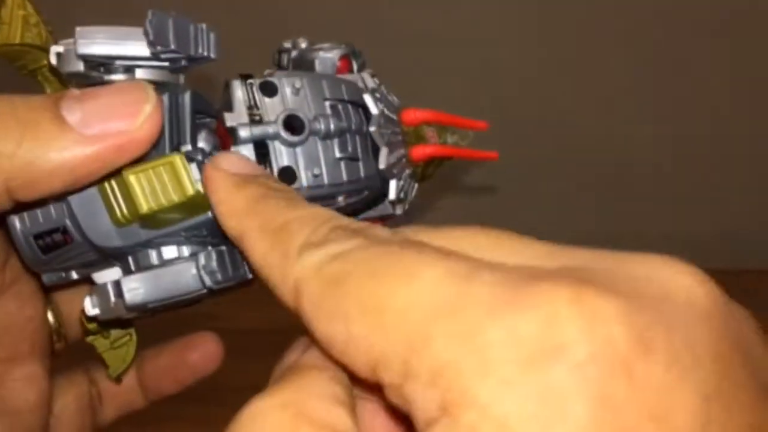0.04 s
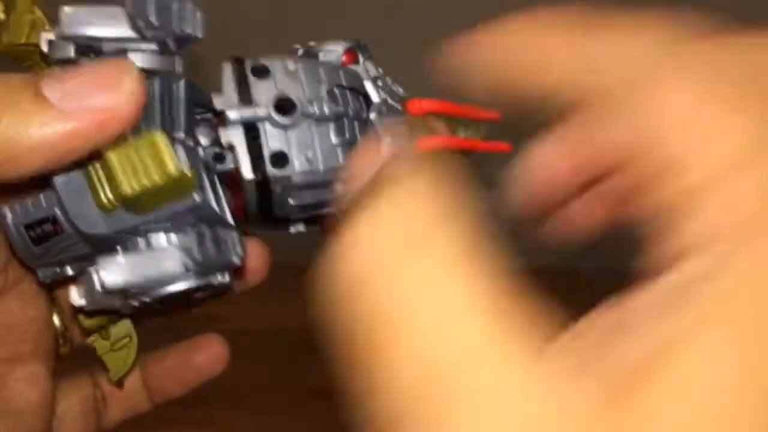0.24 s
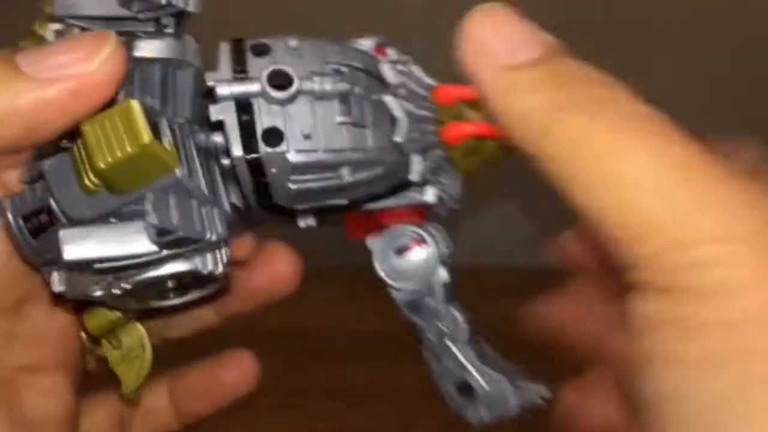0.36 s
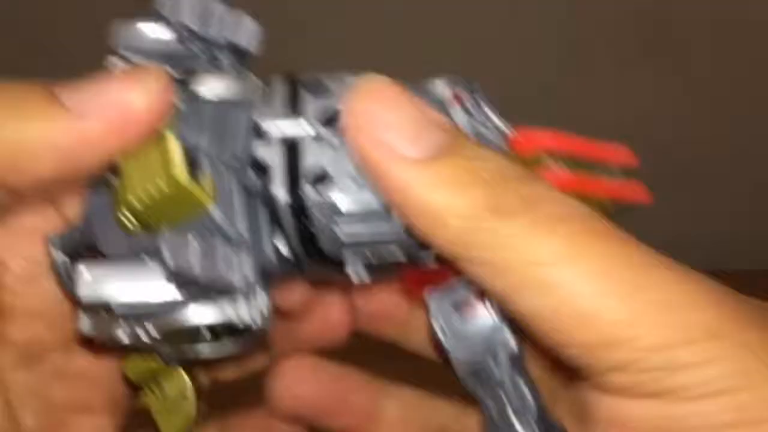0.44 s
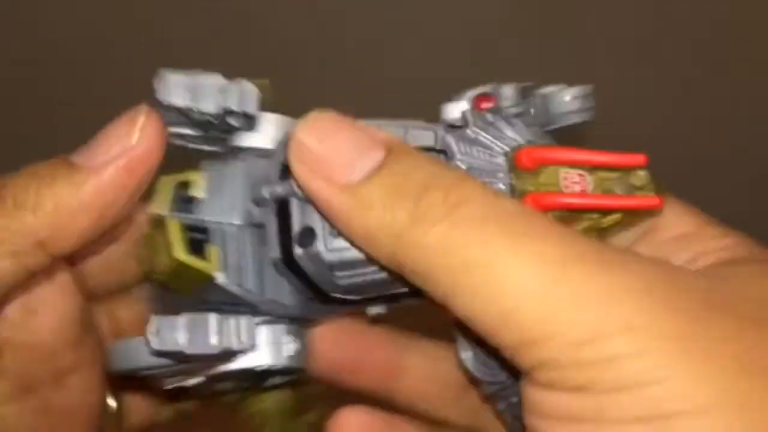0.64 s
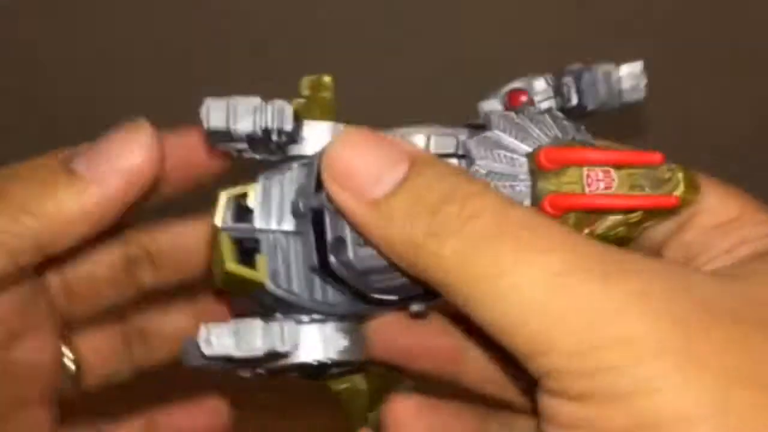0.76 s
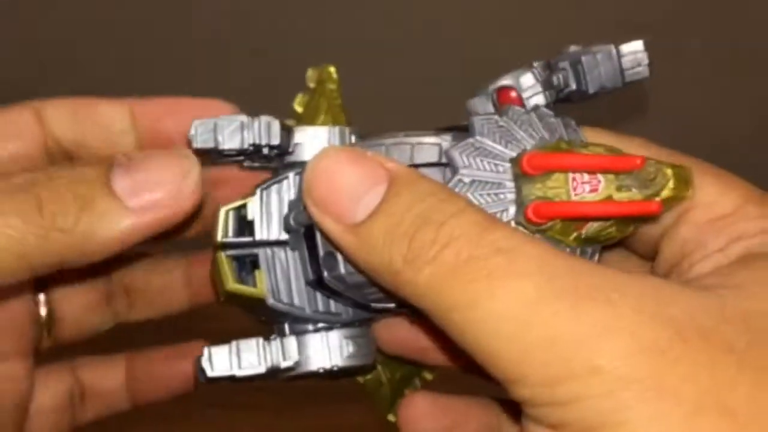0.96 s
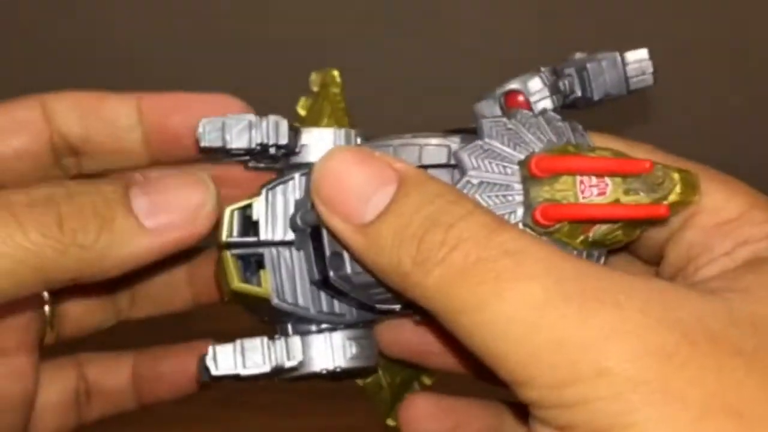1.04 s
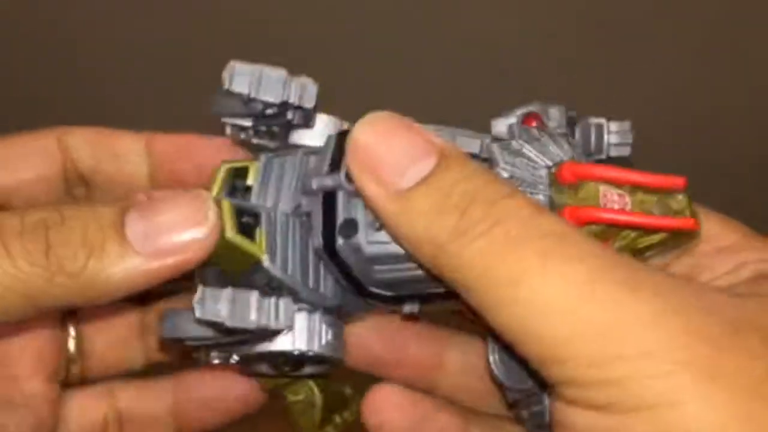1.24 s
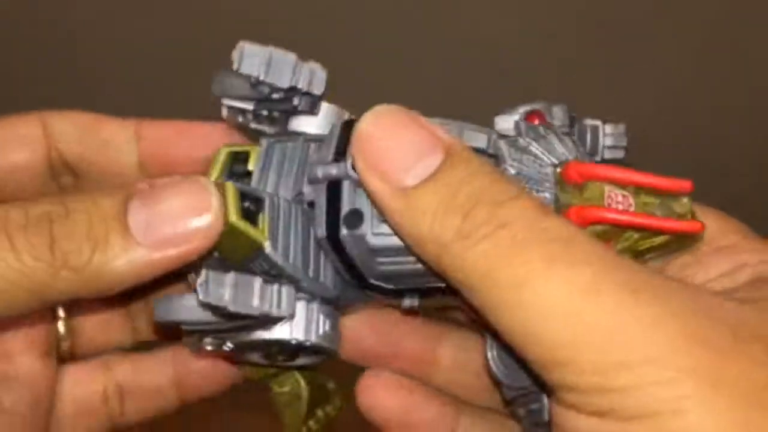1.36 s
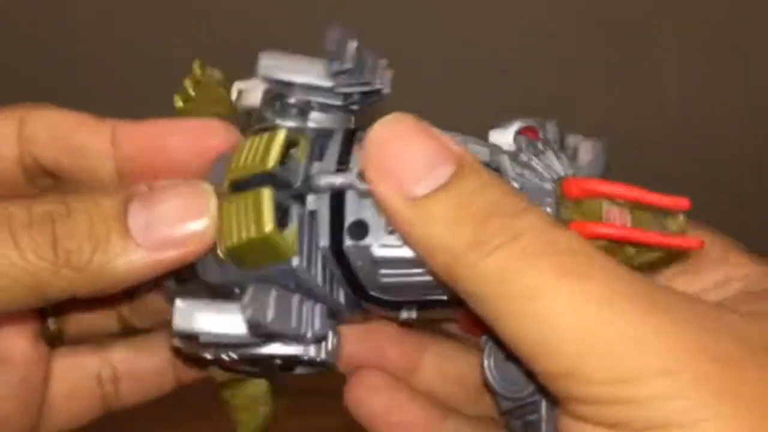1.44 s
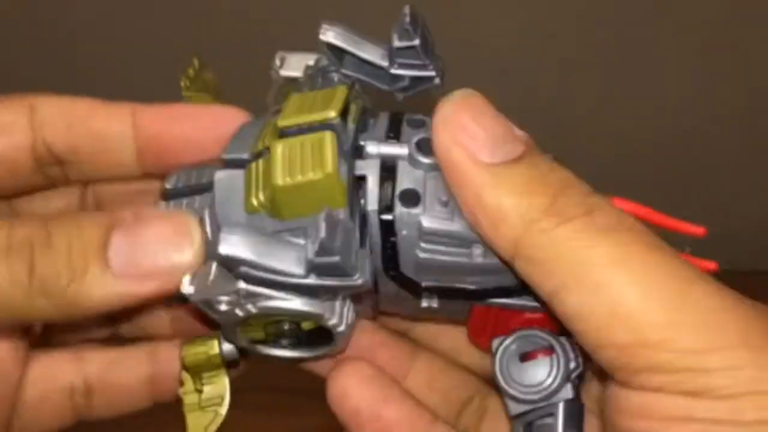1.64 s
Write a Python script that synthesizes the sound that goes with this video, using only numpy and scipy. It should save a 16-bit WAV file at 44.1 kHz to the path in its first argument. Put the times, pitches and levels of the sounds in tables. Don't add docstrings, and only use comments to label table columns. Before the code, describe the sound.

Plastic toy joints clicking and snapping into place, with light ticks and rubs, close to the microphone

```python
import sys
import numpy as np
from scipy import signal
from scipy.fft import rfft, irfft
from scipy.io import wavfile
from scipy.ndimage import uniform_filter1d

SR = 44100
rng = np.random.default_rng(int(sys.argv[2]) if len(sys.argv) > 2 else 0)


def volts_from_db(level):
    exponent = np.asarray(level, float) / 20
    return 10 ** exponent


def waveform_to_disk(signal):
    frames = np.transpose(np.atleast_2d(signal))
    scaled = np.clip(frames, -1, 1) * 32767
    samples = np.round(scaled).astype(np.int16)
    wavfile.write(sys.argv[1], SR, samples)


N = 74970


def table_at(table, hz):
    table_hz, value = np.array(table).T
    return np.interp(np.log(hz), np.log(table_hz), value)


def ring(x, hz, width_hz):
    r = np.exp(-np.pi * width_hz / SR)
    w = 2 * np.pi * hz / SR
    return signal.lfilter([0, np.sin(w)], [1, -2 * r * np.cos(w), r * r], x)


def band(x, lo_hz, hi_hz):
    return signal.sosfilt(signal.butter(2, [lo_hz, min(hi_hz, SR / 2.1)], "band", fs=SR, output="sos"), x)


def add(out, x, s):
    i = int(s * SR)
    out[..., i:i + x.shape[-1]] += x[..., :N - i]


def waist():
    # hz, width_hz, level_db
    waist_modes = [(1418, 200, -7), (1656, 300, -4), (2426, 400, -5), (3163, 200, -4.5), (3652, 1500, 1.5),
                   (4750, 1200, -14), (5290, 150, -5.5), (5900, 870, 1), (1954, 250, -12.5),
                   (6684, 430, -9), (8823, 400, -5), (9740, 150, -10.5), (11826, 330, -10.5),
                   (14100, 1400, -20.5)]
    # start_s, peak_db, chatter_s, tilt_db_per_octave, favoured_hz
    waist_snaps = [
        (.1775, -50, 0.0022, 1.5, 5430),
        (.2007, -3.5, 0.00091, 4, 5900),
        (.2016, -8, 0.00054, 1, 1740),
        (.2025, -10.5, 0.00052, -1, 5400),
        (.203, -6.5, 0.000407, 4, 11900),
        (.2042, -6.5, 0.000676, -3, 3290),
        (.2049, -14.5, 0.00016, -1, 3800),
        (.2064, -29, 0.00095, -1.5, 2600),
        (.661, -46.5, 0.0059, 4, 5270),
        (.8437, -49.5, 0.000838, 0.5, 5710),
    ]
    # start_s, length_s, level_db, tilt_db_per_octave, favoured_hz
    waist_slides = [
        (.187, 0.01, -66, -5, 2995),
        (.84, 0.044, -72, 9, 5900),
    ]
    return clicks(waist_snaps, waist_modes, knock_db=-21.5) + slides(waist_slides, waist_modes)


def panel():
    # hz, width_hz, level_db
    panel_modes = [(1600, 150, -9.5), (2121.5, 89, -12), (2480, 110, -2), (2964, 240, -13.5),
                   (4000, 239, -1), (4668, 820, -4), (5400, 270, -5.5), (6330, 920, -5.5), (7847, 280, -6),
                   (8975, 300, -8), (10905, 420, -17.5), (12400, 500, -26.5), (13060, 1200, -14),
                   (15185, 600, -19.5)]
    # start_s, peak_db, chatter_s, tilt_db_per_octave, favoured_hz
    panel_snaps = [
        (1.031, -68.5, 0.00099, 3.5, 4000),
        (1.0531, -7.5, 0.000305, 1.8, 13500),
        (1.0533, -6, 0.0004, -0.05, 4000),
        (1.0546, -16.5, .0008, 1.23, 1600),
        (1.0562, -22.5, .001, 3.2, 2480),
        (1.0593, -31, 0.0014, -0.84, 4000),
    ]
    return clicks(panel_snaps, panel_modes, knock_db=-38)


def peg():
    # hz, width_hz, level_db
    peg_modes = [(1583, 190, 0.5), (2480, 330, -3.5), (3000, 200, -2.5), (4171, 280, -3), (5000, 264, -4.5),
                 (5916, 260, -2.5), (6930, 270, -10), (7517, 236, -8.5), (8252, 320, -7),
                 (9000, 214.3, -10.5), (10440, 810, -9), (14800, 550, -18.5)]
    # start_s, peak_db, chatter_s, tilt_db_per_octave, favoured_hz
    peg_snaps = [
        (1.6425, -29.5, 0.00074, 0, 5900),
        (1.6433, -27, .0006, 1, 4080),
        (1.644, -20.5, .0004, 0.5, 4000),
        (1.6448, -20, 0.000314, -2.5, 2520),
        (1.6463, -23.5, 0.00076, 4, 1600),
        (1.6474, -22, 0.00063, -4.5, 3000),
        (1.649, -26.5, 0.00056, -9, 5900),
    ]
    return clicks(peg_snaps, peg_modes, knock_db=-22.5)


def limbs():
    # hz, width_hz, level_db
    limb_modes = [(1643, 390, -1), (2470, 170, 0), (3787, 260, -2), (4926, 220, -9.5), (5861, 320, -4.5),
                  (7000, 410, -15.5), (7280, 460, -14), (8100, 290, -13.5), (9090, 180, -12.5),
                  (10610, 730, -16), (12170, 520, -19), (15900, 600, -27.5)]
    # start_s, peak_db, chatter_s, tilt_db_per_octave, favoured_hz
    limb_ticks = [(.0513, -33.5, .002, -3.5, 2540), (.061, -52.5, .002, -3.5, 2480),
                  (.1515, -48.5, .002, -4.5, 1600), (.808, -61, 0.0028, -1.5, 2460),
                  (.849, -55, .002, -3.5, 3020), (.881, -56, 0.011, 3.5, 1600),
                  (.9455, -51.5, 0.0028, -9.5, 1600), (.9818, -40.5, .002, -10, 2519),
                  (1.2319, -41.5, .001, 0.5, 4000), (1.2336, -36, .0005, 3, 5000),
                  (1.2347, -38.5, .0006, -3.5, 2410), (1.2362, -41, .001, 4.5, 4000),
                  (1.2393, -38, .0004, 3, 5800), (1.2405, -37, .0005, -8.5, 2430),
                  (1.2424, -40, .001, -3, 4000), (1.2462, -44.5, .001, -2, 2435),
                  (1.3257, -35.5, .0005, -1, 5000), (1.3272, -39, 0.00072, -0.5, 2498),
                  (1.344, -29, .0008, -8, 5800), (1.3452, -34, .0006, 0.5, 2430),
                  (1.3497, -36.5, .001, 4.5, 2450), (1.3535, -36.5, .002, -5.5, 5800),
                  (1.3575, -46.5, .0005, 6, 5000), (1.3592, -39, .0004, 5, 8450),
                  (1.36, -29.5, .0006, 0, 2440), (1.3616, -32.5, .0005, -9.5, 4000),
                  (1.3655, -39.5, .001, -5, 2460), (1.5662, -45, .002, -2, 2450),
                  (1.6103, -44.5, .001, 1, 2800), (1.62, -54, .002, 4, 2480),
                  (1.6385, -42.5, 0.00188, -5, 4100)]
    # start_s, length_s, level_db, tilt_db_per_octave, favoured_hz
    limb_slides = [(.0, 0.0358, -67.5, -0.5, 1600), (.04, 0.0084, -59, -0.5, 2380),
                   (.075, 0.027, -70.5, -11.5, 2450), (.93, 0.125, -69, 5, 9000),
                   (1.032, 0.094, -54.5, 4.5, 2464), (1.228, 0.0345, -51.5, 1.5, 2490),
                   (1.345, 0.02545, -51.5, 3.5, 2420), (1.37, 0.1595, -66, 3, 2470),
                   (1.505, 0.0476, -57.5, 2, 2450), (1.57, 0.0924, -64, 4, 2420),
                   (1.255, 0.086, -67.5, 4, 4000)]
    return clicks(limb_ticks, limb_modes, knock_db=-22) + slides(limb_slides, limb_modes)


def flap():
    # hz, width_hz, level_db
    flap_modes = [(1820, 200, -6), (2176, 150, -4.5), (3800, 158, -6), (5257, 255, -7), (6118, 210, -6),
                  (7063, 200, -7.5), (8600, 203, -8.5), (9820, 430, -17), (12350, 400, -16),
                  (14930, 400, -20)]
    # start_s, peak_db, chatter_s, tilt_db_per_octave, favoured_hz
    flap_ticks = [
        (.4958, -48, .001, 1.1, 4514),
        (.4985, -52, .001, 0, 2103),
        (.5012, -42, .0006, -1.51, 1932),
        (.5026, -38.5, 0.00032, 1.74, 6210),
        (.5038, -45.5, 0.0018, 1.2, 5000),
        (.5057, -45.5, .001, -1.18, 1900),
        (.5085, -49.5, .001, 2.09, 7000),
    ]
    # start_s, length_s, level_db, tilt_db_per_octave, favoured_hz
    flap_slides = [
        (.494, 0.0167, -49.5, 0.0043, 1888),
    ]
    return clicks(flap_ticks, flap_modes, knock_db=-38) + slides(flap_slides, flap_modes)


def finger_strokes():
    # hz, width_hz, level_db
    grip_modes = [(1420, 36, -2), (1780, 77, 0.5), (3560, 500, 1), (5800, 780, -4), (8200, 2500, -2.5),
                  (10070, 830, -7.5), (12560, 900, -11), (15000, 900, -11.5)]
    # start_s, length_s, level_db, tilt_db_per_octave, favoured_hz
    strokes = [
        (.47, 0.0728, -65, 1, 8200),
        (.54, 0.126, -59.5, 3, 5800),
        (.59, 0.052, -60.5, -1, 1420),
        (.625, 0.0599, -60, -1, 1780),
    ]
    return slides(strokes, grip_modes)


def clicks(table, modes, knock_db):
    knock_hz, upper_hz, knock_width_hz = 361.3, 662.4, 120
    upper_db, far_knock_db = -3.5, 7
    burst_s, follow_share = .008, 0.3967
    out, t, burst = np.zeros((2, N)), np.arange(2048) / SR, -1
    blow = t == 0
    upper_gain = volts_from_db([[upper_db], [upper_db - far_knock_db]])
    knock = ring(blow, knock_hz, knock_width_hz) + upper_gain * ring(blow, upper_hz, 2 * knock_width_hz)
    knock = knock * volts_from_db([[knock_db], [knock_db + far_knock_db]])
    for s, db, length, tilt_db, hz in table:
        chatter = impacts(5400, spread_db=3, size=2048)
        push = chatter * (t < length) * (1 - 0.55 * t / length)
        push[0] = 2.2
        x = shell(push, np.linalg.norm(push) * blow, modes, tilt_db, -14, hz)
        x = volts_from_db(db) * (x / np.abs(x[0]).max() + knock)
        burst = s if s - burst > burst_s else burst
        share = 1 if s == burst else follow_share
        add(out[0], x[0], s)
        add(out[1], share * x[1], burst)
    return out


def slides(table, modes):
    out, t = np.zeros((2, N)), np.arange(8192) / SR
    for s, length, db, tilt_db, hz in table:
        grit = impacts(22000, spread_db=4.5, size=8192)
        x = shell(grit, grit, modes, tilt_db, -1.5, hz)
        swell = np.sin(np.pi * np.clip(t / length, 0, 1)) ** 0.7
        add(out, x / x[0].std() * volts_from_db(db) * swell, s)
    return out


def impacts(per_s, spread_db, size):
    when = rng.random(size)
    sign, size_draw = rng.standard_normal((size, 2)).T
    return (when < per_s / SR) * np.sign(sign) * volts_from_db(spread_db * np.clip(size_draw, -2, 2))


def shell(push, far_push, modes, tilt_db, crack_db, favoured_hz):
    favour_db, favour_octaves = 6, 0.33
    narrow = 0.94
    far_blur = 1.6
    far_crack_db, far_tilt_db = -5.5, -0.5
    near = volts_from_db(crack_db + tilt_db) * band(push, 2000, 10000)
    unit = np.arange(len(push)) == 0
    f = np.arange(257) * SR / 512 + 1
    power = volts_from_db(2 * (crack_db + tilt_db + far_crack_db)) * (f > 1300)
    for k, (hz, w, db) in enumerate(modes):
        favour = favour_db * np.exp(-(np.log2(hz / favoured_hz) / favour_octaves) ** 2)
        gain = np.sqrt(w / 300) * volts_from_db(db + tilt_db * np.log2(hz / 4000) + favour)
        uneven = push * (1 + 0.49 * rng.standard_normal(len(push)))
        rung = ring(uneven, hz, w * narrow)
        energy = np.linalg.norm(push) * np.linalg.norm(ring(unit, hz, w * narrow))
        rung *= energy / np.linalg.norm(rung)
        near = near + gain * (-1) ** k * np.sqrt(narrow) * rung
        power = power + far_blur * (gain * SR / (4 * np.pi)) ** 2 / ((f - hz) ** 2 + (w * far_blur / 2) ** 2)
    far_response = np.sqrt(power) * volts_from_db(far_tilt_db * np.log2(f / 4000))
    colour = np.fft.fftshift(irfft(far_response))[64:448]
    far = signal.fftconvolve(far_push, colour)[128:len(push) + 128]
    return band(band(np.array([near, far]), 1150, 26000), 1150, 26000)


def jolts():
    # start_s, peak_db, settled_hz, t60_s
    blows = [
        (0.2024, -33, 95, 0.061),
        (0.206, -22.5, 41.1, 0.09),
        (0.276, -43, 40.1, 0.0764),
        (0.515, -47, 49.49, 0.081),
        (1.053, -45.5, 45.24, 0.136),
        (1.648, -33.5, 89.6, 0.0135),
        (1.654, -48, 41.4, 0.172),
    ]
    sag, sag_s = 1.6, 0.0075
    out, t = np.zeros(N), np.arange(8192) / SR
    for s, db, hz, t60 in blows:
        turns = hz * (t + sag * sag_s * (1 - np.exp(-t / sag_s)))
        add(out, -volts_from_db(db - 60 * t / t60) * np.sin(2 * np.pi * turns), s)
    return out


def walls(x):
    # delay_s, level_db
    echoes = [(0.0055, -33.5), (0.0098, -26.5), (0.0122, -33), (0.0194, -33), (0.023, -30), (0.029, -28),
              (0.032, -37), (0.045, -34.5)]
    # hz, t60_s
    room_t60 = [(300, 0.12), (2000, 0.3858), (6000, 0.278), (15000, 0.19)]
    room_db, rise_s, smear_s = -24.5, 0.018, .0021
    late_db, late_stretch = -6, 2.2
    t = np.arange(SR // 2) / SR
    edges = 150 * 2 ** np.arange(0, 7.5, .5)
    tail = np.zeros(len(t))
    for lo, hi in zip(edges[:-1], edges[1:]):
        fall_db = -60 * t / table_at(room_t60, lo)
        decay = volts_from_db(fall_db) + volts_from_db(late_db + fall_db / late_stretch)
        tail += band(rng.standard_normal(len(t)), lo, hi) * decay
    tail *= 1 - np.exp(-t / rise_s)
    tail *= volts_from_db(room_db) / np.sqrt(np.sum(tail ** 2))
    for s, db in echoes:
        burst = rng.standard_normal(len(t)) * (t >= s) * np.exp(-np.abs(t - s) / smear_s)
        tail += volts_from_db(db) * burst / np.sqrt(np.sum(burst ** 2))
    return signal.fftconvolve(x, tail)[:N]


def room_tone():
    # hz, level_db (per Hz)
    spectrum = [(24, -18), (48, 3), (110, -9.5), (300, -11), (520, -23.5), (1500, -28.5), (6000, -36),
                (15500, -43)]
    rumble_walk_db, hiss_walk_db = 1.5, 4.5
    hz = np.maximum(np.arange(N // 2 + 1) * SR / N, 1)
    colour = volts_from_db(table_at(spectrum, hz))
    low = rfft(rng.standard_normal(N)) * colour * (hz < 450)
    high = rfft(rng.standard_normal(N)) * colour * (hz >= 450)
    walk = uniform_filter1d(np.repeat(rng.standard_normal(N // 2048 + 1), 2048), 2048)[:N]
    rumble = irfft(low, N) * volts_from_db(rumble_walk_db * walk)
    hiss = irfft(high, N) * volts_from_db(hiss_walk_db * walk)
    x = rumble + hiss
    return x / x.std() * volts_from_db(-60)


def scene():
    near, far = waist() + panel() + peg() + limbs() + flap() + finger_strokes()
    return (near + walls(far) + jolts() + room_tone())[None]


def roll_off(x):
    return signal.sosfilt(signal.butter(12, 17140, fs=SR, output="sos"), x)


def record(dry):
    x = signal.sosfilt(signal.ellip(6, .3, 28, 16300, fs=SR, output="sos"), dry)
    x = signal.sosfilt(signal.butter(2, 38, "high", fs=SR, output="sos"), x)
    return roll_off(x)


dry = scene()
out = record(dry)
waveform_to_disk(out)
```